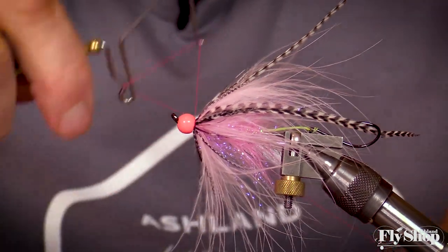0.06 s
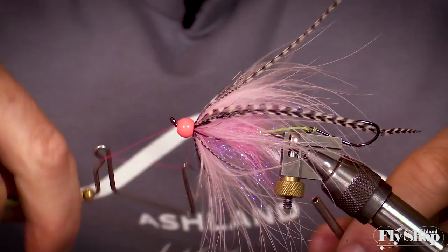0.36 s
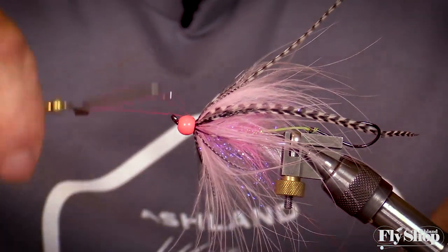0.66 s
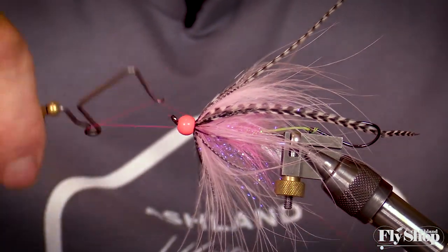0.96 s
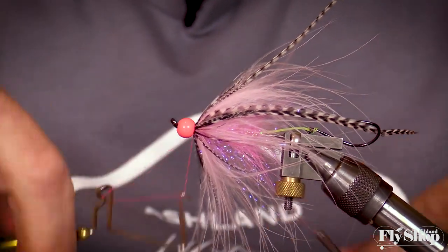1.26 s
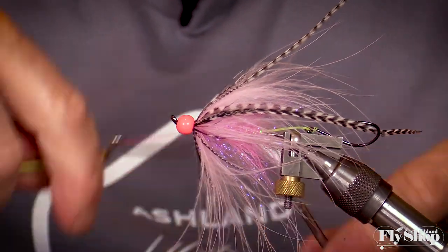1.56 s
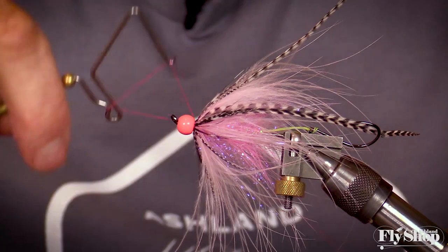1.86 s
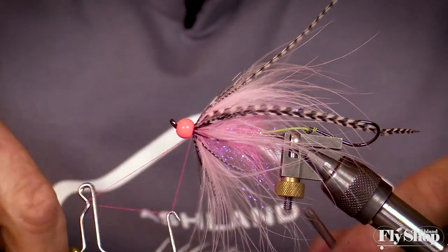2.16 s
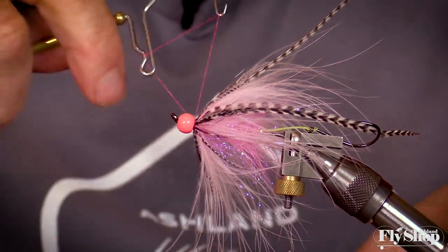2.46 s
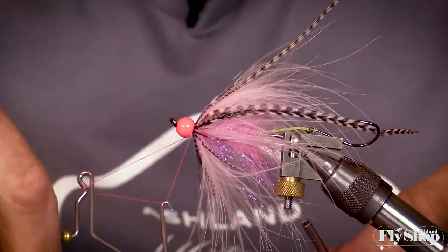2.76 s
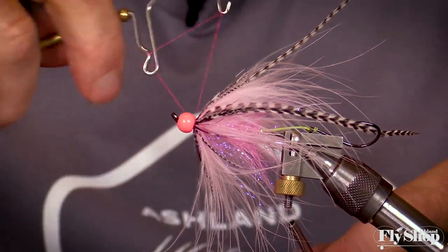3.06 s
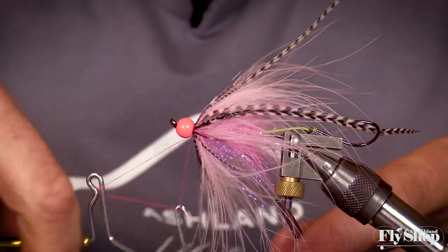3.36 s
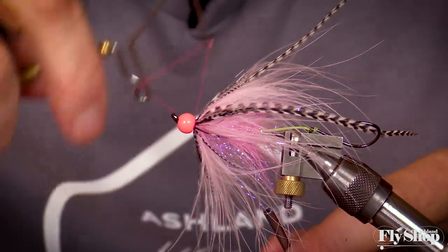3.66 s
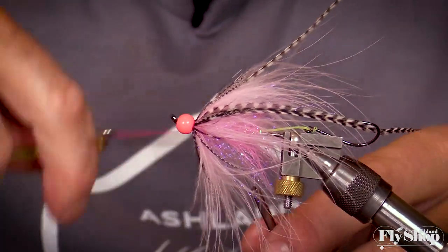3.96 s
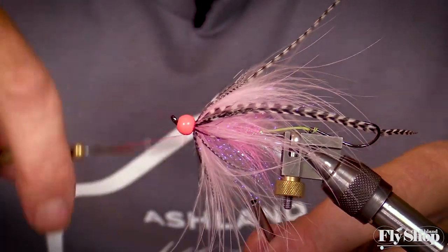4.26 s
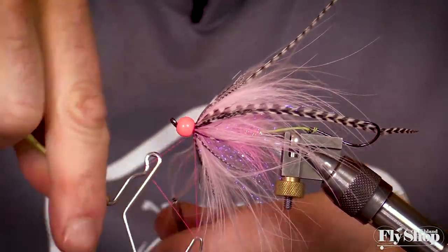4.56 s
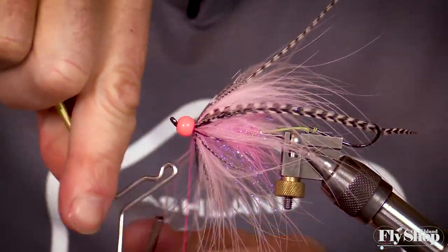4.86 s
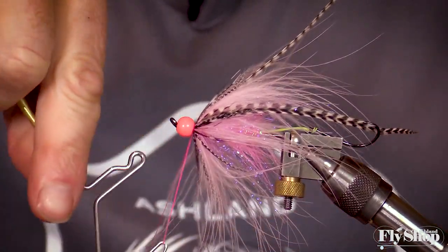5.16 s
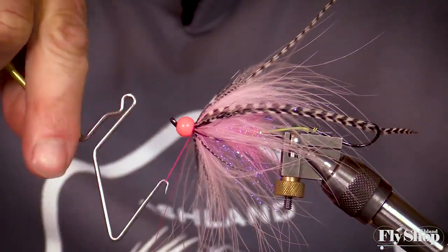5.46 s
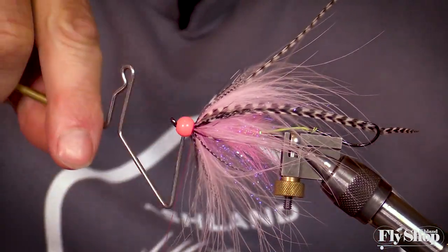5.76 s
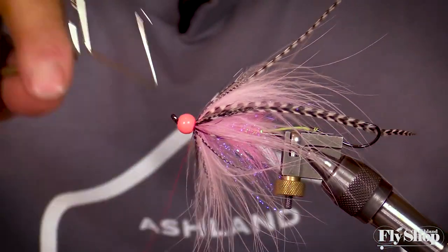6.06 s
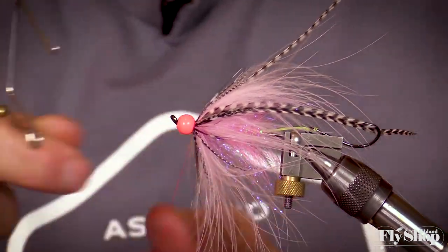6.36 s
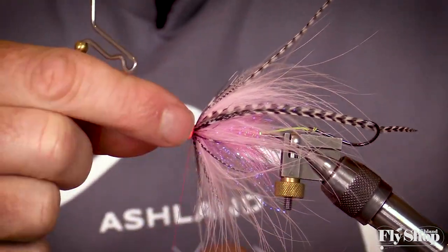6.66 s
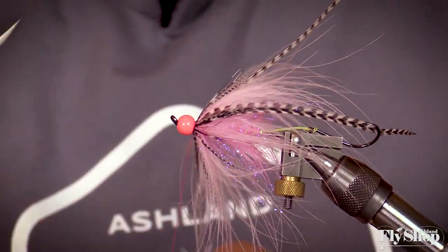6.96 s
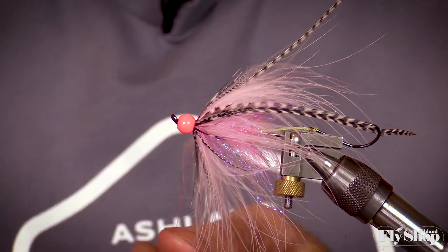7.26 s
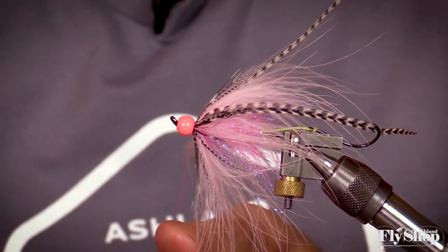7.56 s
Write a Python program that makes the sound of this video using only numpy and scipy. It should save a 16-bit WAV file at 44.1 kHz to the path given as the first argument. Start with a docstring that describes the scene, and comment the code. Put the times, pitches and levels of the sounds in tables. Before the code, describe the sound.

Faint ticks of thread slipping off a wire tool and soft finger brushing, then a metal tool clatters onto a bench.

```python
"""A fly-tying bench in a quiet room, one microphone close to the vise, during a whip finish.
Over low room tone, fingers brush thread and feathers and the turning wire tool plucks the thread.
From 0.7 s the thread slips off the wire in light ticks that ring the hook; later ones shake the stand.
After 6 s the wire leaves the knot, fingers rasp along the thread and feather barbs flick past.
Last and loudest, at 7.4 s, a tool lands on the bench and bounces to rest."""
import sys
import numpy as np
from scipy import signal
from scipy.fft import rfft, irfft
from scipy.io import wavfile
from scipy.ndimage import uniform_filter1d

SR = 44100
rng = np.random.default_rng(int(sys.argv[2]) if len(sys.argv) > 2 else 0)


def persist_wave(psi):
    """Save psi, clipped to +-1, as 16-bit WAV."""
    counts = np.round(np.clip(psi, -1, 1) * 32767).astype(np.int16)
    wavfile.write(sys.argv[1], SR, np.atleast_2d(counts).T)


N = 335160
TIME = np.arange(N) / SR
AFTER = TIME[:SR // 2]  # seconds since a contact


def gain_of(db):
    """Decibels to amplitude."""
    return 10 ** (np.asarray(db) / 20)


def unit_rms(x):
    """Scales to rms 1."""
    return x / np.sqrt(np.mean(x ** 2) + 1e-20)


def curve_at(points, hz):
    """Reads a curve on a log-frequency axis."""
    f, value = np.transpose(points)
    return np.interp(np.log(hz + 1), np.log(f + 1), value)


def add(mix, s, sound):
    """Mixes a sound in at time s."""
    part = mix[round(s * SR):][:len(sound)]
    part += sound[:len(part)]


def coloured(x, spectrum, tilt_db=0):
    """Gives x a spectrum, tilted per octave, at rms 1."""
    hz = np.fft.rfftfreq(len(x), 1 / SR)
    gain = gain_of(curve_at(spectrum, hz) + tilt_db * np.log2(hz + 1))
    return unit_rms(irfft(rfft(x) * gain, len(x)))


def burst(spectrum, length, rise, tilt_db=0):
    """A contact: noise that rises and dies away, both timed in seconds."""
    shape = (1 - np.exp(-AFTER / rise)) * np.exp(-AFTER / length)
    return coloured(rng.standard_normal(len(AFTER)), spectrum, tilt_db) * shape / shape.max()


def ring(modes, rise, scatter_db=0):
    """Dying modes; scatter varies their levels, as when each blow lands on another spot."""
    tones = sum(gain_of(db + scatter_db * rng.standard_normal() - 60 * AFTER / t60)
                * np.sin(2 * np.pi * (hz * AFTER + rng.random())) for hz, db, t60 in modes)
    return tones * (1 - np.exp(-AFTER / rise))


def swells(strokes, rest=0):
    """Gain over time: each stroke swells and fades as a bell, over a resting gain."""
    power = sum((gain_of(db) * np.exp(-.5 * ((TIME - s) / np.where(TIME < s, rise, fall)) ** 2)) ** 2
                for s, db, rise, fall in strokes)
    return np.sqrt(power + rest ** 2)


def friction(spectrum, gain, grain_db, grains_per_s):
    """Fibres catch and let go: grains of uneven size over a smooth hiss."""
    grains = rng.standard_normal(N) * rng.exponential(1, N) * (rng.random(N) < grains_per_s / SR)
    return gain * coloured(rng.standard_normal(N) + gain_of(grain_db) * unit_rms(grains), spectrum)


# the still room at the microphone: (frequency [Hz], relative level [dB])
AIR = [(15, -25), (28, -5.5), (50, -5), (85, -6.5), (120, -3.5), (175, -14.5), (240, -13), (330, -19.5),
       (460, -22), (700, -25.5), (1400, -32), (2500, -35), (6500, -39.5), (16000, -43.5)]
def room_tone(air_db=-61.5, hum_db=-63.5, hum_hz=50):
    """Room rumble, microphone hiss and a low hum."""
    hum = np.sqrt(2) * np.sin(2 * np.pi * (hum_hz * TIME + rng.random()))
    return gain_of(air_db) * coloured(rng.standard_normal(N), AIR) + gain_of(hum_db) * hum


# soft finger strokes: (peak time [s], level [dB], rise [s], fall [s])
BRUSHES = [(1.55, -73.5, .06, 0.055), (2.33, -78, .08, 0.081), (4.73, -72, 0.2, 0.071),
           (5.3, -77.5, 0.3, .5), (6.35, -72, 0.37, 0.22), (7.13, -68.5, 0.076, 0.11)]
# their hiss from close by: (frequency [Hz], relative level [dB])
BRUSH_HISS = [(1000, 13.5), (3000, -3.5), (6500, 4), (10000, -1.5), (16000, -21)]
def brushing(rest_db=-83.5):
    """Fingers brush thread and feathers; the thread never quite stops sliding."""
    return friction(BRUSH_HISS, swells(BRUSHES, gain_of(rest_db)), grain_db=-1, grains_per_s=900)


# arm moves at the bench: (peak time [s], level [dB], rise [s], fall [s])
REACHES = [(2.92, -69, .35, 0.26), (4.92, -65.5, .25, .3), (6.35, -63.5, 0.17, .5)]
# their rustle: (frequency [Hz], relative level [dB])
RUSTLE = [(60, -7), (150, 2), (260, -1), (345, 1.5), (520, -6.5), (700, -6.5), (850, -9), (1060, -9.5),
          (1500, -21), (3000, -24), (8000, -43)]
def arm_rustle(start_db=-79.5, growth_db_per_s=2):
    """The arms move over a soft rustle that grows steadily."""
    stirring = gain_of(start_db + growth_db_per_s * TIME)
    return friction(RUSTLE, swells(REACHES, stirring), grain_db=-11.5, grains_per_s=540)


def twang(modes, flat_share=0.049, settle_s=0.0054, shiver_share=0.014, shiver_s=0.0014):
    """Thread or wire starts flat and rises as it pulls tight; shivering tension shakes the pitch."""
    shiver = unit_rms(uniform_filter1d(rng.standard_normal(len(AFTER)), round(shiver_s * SR)))
    clock = np.cumsum(1 - flat_share * np.exp(-AFTER / settle_s) + shiver_share * shiver) / SR
    tones = sum(gain_of(db - 60 * AFTER / t60) * np.sin(2 * np.pi * (hz * clock + rng.random()))
                for hz, db, t60 in modes)
    return tones * (1 - np.exp(-AFTER / 0.00045))


# tiny plucks at the hook: (time [s], level [dB], pitch [Hz], relative octave level [dB], t60 [s])
PLUCKS = [(0.312, -64, 7850, -15, .04), (0.640, -67, 5360, -2, .035), (0.883, -49, 6800, -2, 0.022),
          (4.573, -68, 7150, -20, .05), (5.076, -64.5, 7240, -10, 0.039), (5.140, -67, 8600, -10, .04)]
def plucks():
    """Thread and thin wire are plucked as the tool turns."""
    out = np.zeros(N)
    for s, db, hz, octave_db, t60 in PLUCKS:
        add(out, s, gain_of(db) * twang([(hz, 0, t60), (2 * hz, octave_db, t60)]))
    return out


# decay of the room around the bench: (frequency [Hz], t60 [s])
ROOM_T60 = [(100, 0.26), (600, 0.34), (2500, 0.23), (6000, 0.24), (14000, 0.17)]
def reflections(x, delay, build):
    """Diffuse reflections build up after a delay and die band by band."""
    hz, t, bands = signal.stft(rng.standard_normal(len(AFTER)), SR, nperseg=256)
    decay = gain_of(-60 * t / curve_at(ROOM_T60, hz)[:, None])
    tail = signal.istft(bands * decay, SR)[1][:len(AFTER)]
    tail *= np.clip((AFTER - delay) / build, 0, 1)
    return signal.oaconvolve(x, tail / np.linalg.norm(tail))[:N]


def bump(hz):
    """A dull, low ring of the vise or the bench."""
    return ring([(hz, 4, .25)], rise=0.01)


# low knocks of the hands: (time [s], gain [dB], pitch [Hz])
BUMPS = [(0.47, -47.5, 52), (3.47, -51, 59.4), (4.488, -54, 52.3), (4.95, -50.5, 71.4), (6.181, -48.5, 85)]
def hand_bumps():
    """The hands bump the vise and the bench."""
    out = np.zeros(N)
    for s, db, hz in BUMPS:
        add(out, s, gain_of(db) * bump(hz))
    return out


# thread leaving the wire: (time [s], snap level [dB], snap length [s], hook gain [dB], tool gain [dB],
# twang gain [dB], twang tilt [dB/octave])
SLIPS = [(0.733, -51.5, 0.0014, -77, -67, -56.5, 4), (2.739, -52, 0.0037, -57, -72, -62, 0),
         (3.309, -59.5, .0015, -68, -85, -73, -5), (3.8346, -44, 0.0023, -50, -68, -60, -3),
         (4.8123, -42.5, 0.0044, -53, -57, -49.5, -6), (4.816, -50, 0.0029, -61, -81, -56, -7),
         (6.0530, -44, 0.0013, -53.5, -78, -68, 4), (6.0626, -56, 0.0059, -57, -58, -59, 9)]
# the snap from close by: (frequency [Hz], relative level [dB])
SNAP = [(200, -12), (1000, 0.5), (2200, 1), (3100, 4), (4800, -5), (6000, 1), (7500, 1), (12000, -2.5),
        (16000, -3)]
# modes of the clamped hook, wire tool and taut thread: (frequency [Hz], relative level [dB], t60 [s])
HOOK_MODES = [(1640, -3.5, 0.03), (3153, -2, 0.076), (3500, -16, 0.14), (6002, -3.5, 0.051),
              (10700, -15, 0.07), (11900, -13, 0.062)]
TOOL_MODES = [(8600, -4.5, 0.52), (8660, -8, 0.49)]
THREAD_MODES = [(3674, -6, 0.058), (6010, -1.5, 0.044), (7540, 0.5, 0.04), (12000, 2, .04),
                (15600, -5, .04)]
def slips():
    """The thread snaps off the wire and sets hook, tool and itself ringing."""
    out = np.zeros(N)
    middle_hz = np.median([hz for hz, db, t60 in THREAD_MODES])
    for s, snap_db, length, hook_db, tool_db, twang_db, tilt_db in SLIPS:
        thread = [(hz, db + tilt_db * np.log2(hz / middle_hz), t60) for hz, db, t60 in THREAD_MODES]
        add(out, s, gain_of(snap_db) * burst(SNAP, length, rise=.0001))
        add(out, s, gain_of(hook_db) * ring(HOOK_MODES, rise=0.00082, scatter_db=0.5))
        add(out, s, gain_of(tool_db) * ring(TOOL_MODES, rise=.006))
        add(out, s, gain_of(twang_db) * twang(thread))
    return out


# the vise stand springing back: (time [s], hum gain [dB], hum pitch [Hz], thud level [dB])
RECOILS = [(2.740, -53.5, 214.4, -61.5), (3.834, -45.5, 245, -54.5), (4.812, -54, 201, -47.5),
           (6.054, -47, 249.8, -56)]
# its thud: (frequency [Hz], relative level [dB])
THUD = [(30, -11), (86, 4), (130, -15), (210, -2), (340, -8), (450, -22), (700, -39), (2000, -43)]
def stand_recoils(rock_hz=89, rock_db=7.5, rock_delay_s=0.0076):
    """As the thread lets go, the heavy stand answers slowly: it hums, thuds and rocks."""
    out = np.zeros(N)
    for s, hum_db, hz, thud_db in RECOILS:
        add(out, s, gain_of(hum_db) * ring([(hz, 9, .24)], rise=0.045))
        add(out, s, gain_of(thud_db) * burst(THUD, length=0.06, rise=0.021))
        add(out, s + rock_delay_s, gain_of(thud_db + rock_db) * bump(rock_hz))
    return out


# the wire coming free: (time [s], level [dB], pitch [Hz], t60 [s])
RELEASE = (6.0622, -68, 5480, .27)
def wire_release():
    """The wire's long arm rings as it leaves the finished knot."""
    out = np.zeros(N)
    s, db, hz, t60 = RELEASE
    add(out, s, ring([(hz, db, t60)], rise=.0005))
    return out


# short finger scrapes: (peak time [s], level [dB], rise [s], fall [s])
RASPS = [(6.205, -62.5, 0.014, .055), (6.29, -58, 0.012, .018), (6.338, -60.5, 0.016, 0.031),
         (6.465, -67.5, .04, 0.031)]
# their grainy noise: (frequency [Hz], relative level [dB])
SCRAPE = [(500, 1.5), (1400, -8), (2200, -2), (3150, 1.5), (4200, -7), (5150, -1), (7000, -15.5),
          (11000, -17), (16000, -18)]
def rasping():
    """Fingers catch and slide along the thread."""
    return friction(SCRAPE, swells(RASPS), grain_db=-4.5, grains_per_s=1400)


# single feather barbs: (time [s], level [dB])
FLICKS = [(7.049, -65), (7.125, -60), (7.158, -63), (7.245, -67), (7.332, -62.5)]
# a barb's tick: (frequency [Hz], relative level [dB])
BARB_TICK = [(1000, -31), (4500, -15), (8000, 0), (12000, -2), (16000, -8)]
def feather_flicks():
    """Barbs flick past a finger."""
    out = np.zeros(N)
    for s, db in FLICKS:
        add(out, s, gain_of(db) * burst(BARB_TICK, length=0.0017, rise=.0004))
    return out


# the bench's knock and the rattle of steel: (frequency [Hz], relative level [dB])
KNOCK = [(70, -13), (170, -8), (300, -8.5), (420, -10.5), (600, -1), (1000, -6.5), (1600, -7.5),
         (1900, 2.5), (2700, -1.5), (3800, -4), (5000, -7.5), (6500, -16.5), (9800, -27.5), (16000, -34)]
SIZZLE = [(200, -40), (10500, -24), (11700, -10), (12100, 1), (12500, -12), (13500, -24), (16000, -32)]
# modes of the struck bench: (frequency [Hz], relative level [dB], t60 [s])
BENCH_MODES = [(561, -4, 0.24), (796, -6.5, 0.24), (1079, -9, 0.3), (1361, -0.5, 0.18), (1840, 0, 0.15),
               (1956, -1, 0.16), (2420, 2, 0.23), (2490, 8, 0.079), (2780, -5, 0.16), (3140, -4, 0.27),
               (3700, -14, 0.15), (3790, -4, 0.18), (4560, -8, 0.12), (4840, -7.5, 0.19), (7000, -22, .2),
               (8700, -16, .15)]
def blow(tilt_db):
    """One contact of metal on the bench: a knock, the ringing top and a sizzle of steel."""
    return (burst(KNOCK, length=.0024, rise=0.00059, tilt_db=tilt_db)
            + gain_of(-23.5) * ring(BENCH_MODES, rise=0.0014, scatter_db=2.5)
            + gain_of(-28) * burst(SIZZLE, length=0.036, rise=0.00067))


# the tool striking the bench near the microphone, landings and the larger bounces between them, each played
# alike: (time [s], level [dB], tilt [dB/octave], clang pitch [Hz], clang gain [dB])
STRIKES = [(7.4064, -17, -0.5, 2150, -24), (7.4156, -28, 0.5, 3060, -31), (7.4431, -27.5, 8.5, 2730, -23),
           (7.5050, -18.5, .5, 3480, -30), (7.5235, -39, 5, 7450, -43), (7.5437, -39, 7, 2560, -35),
           (7.5855, -19.5, 0.5, 2700, -16)]
# the bench top giving under each: (frequency [Hz], relative level [dB], t60 [s])
BOOM_MODES = [(30, -1, .3), (81.7, 0.5, .25), (128, -1, .18), (162, 3, 0.19)]
def tool_clatter(touch_lead_s=.0016, chatter_gap_s=.0052, chatter_db=-10.5, loss_db=3.5):
    """One end touches, lighter and brighter; the full blow and two rebounds follow, each with its echoes."""
    out = np.zeros(N)
    for s, db, tilt_db, clang_hz, clang_db in STRIKES:
        clang = gain_of(clang_db) * ring([(clang_hz, 1, .03)], rise=0.0011)
        contacts = [(s - touch_lead_s, gain_of(db - 8.5) * blow(tilt_db + 4)),
                    (s, gain_of(db) * blow(tilt_db) + clang)]
        for k in range(2):
            rebound = gain_of(db + chatter_db - k * loss_db) * blow(tilt_db)
            contacts.append((s + (k + 1) * chatter_gap_s, rebound))
        for at, sound in contacts:
            add(out, at, sound)
            add(out, at, gain_of(-3) * reflections(sound, delay=0.0021, build=0.011))
        add(out, s, gain_of(db - 29.5) * ring(BOOM_MODES, rise=.003))
    return out


def scene():
    """One close microphone feeds both channels; the knot's ticks carry a little of the room."""
    knot = plucks() + slips() + wire_release()
    knot += gain_of(-11.5) * reflections(knot, delay=0.0054, build=.015)
    hands = brushing() + arm_rustle() + hand_bumps() + rasping() + feather_flicks()
    mono = room_tone() + hands + knot + stand_recoils() + tool_clatter()
    return np.array([mono, mono])


def record(dry, edge_hz=15950):
    """The recorder's band limit."""
    low_pass = signal.firwin(511, edge_hz, window=("kaiser", 9), fs=SR)
    return signal.oaconvolve(dry, low_pass[None], "same")


dry = scene()
out = record(dry)
persist_wave(out)
```